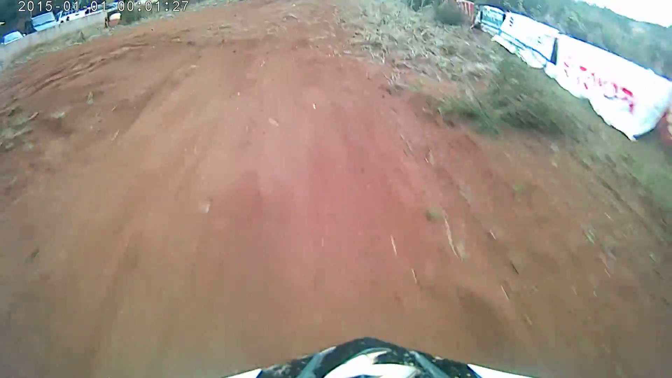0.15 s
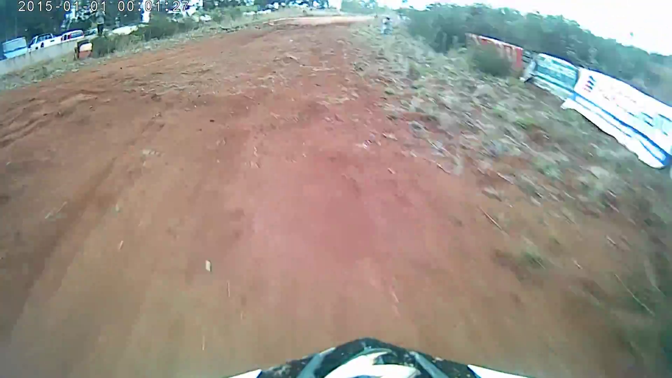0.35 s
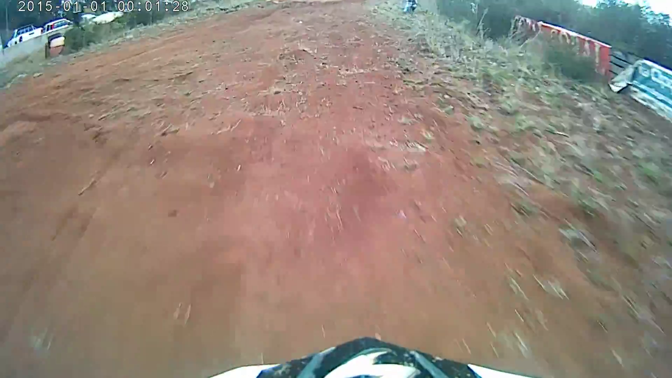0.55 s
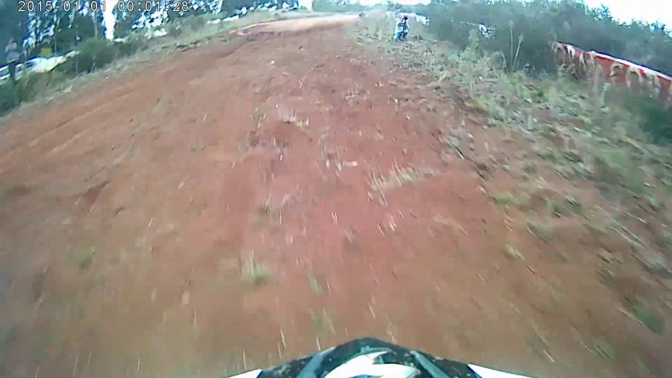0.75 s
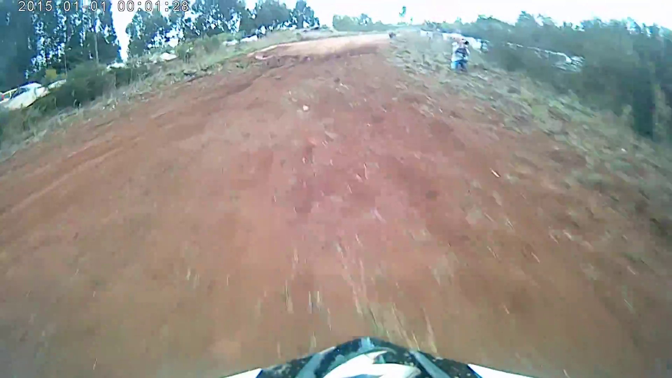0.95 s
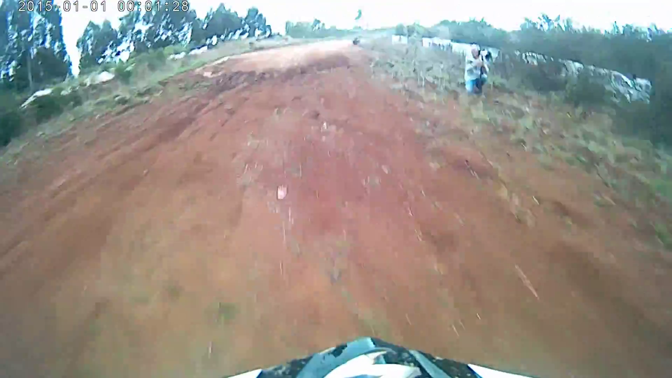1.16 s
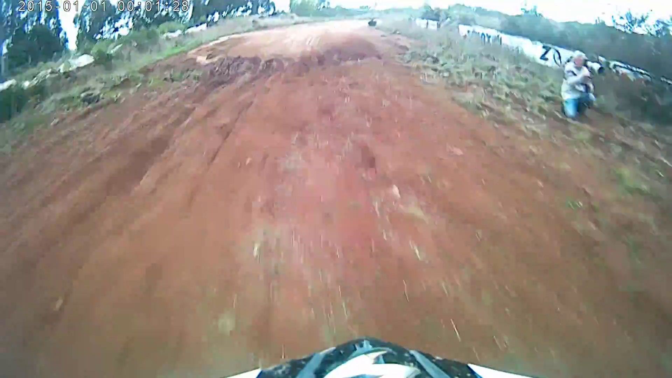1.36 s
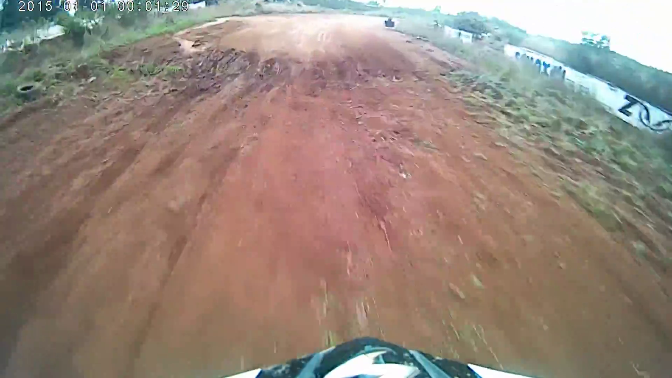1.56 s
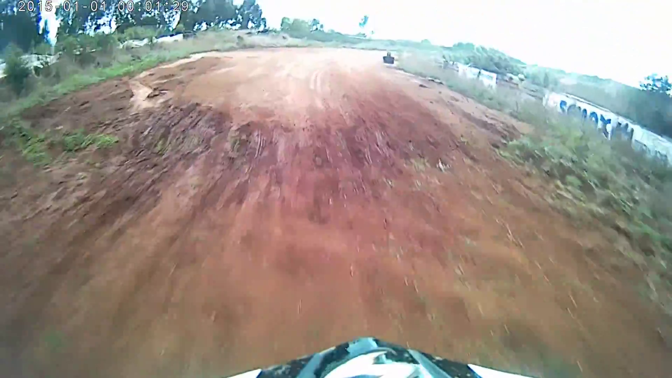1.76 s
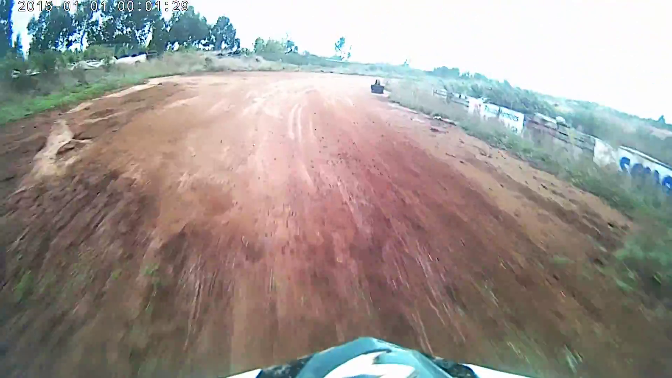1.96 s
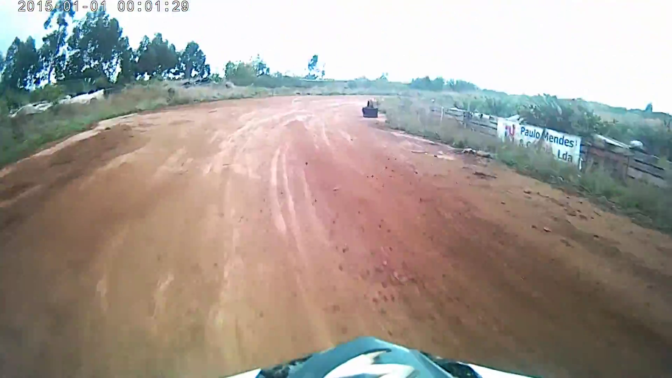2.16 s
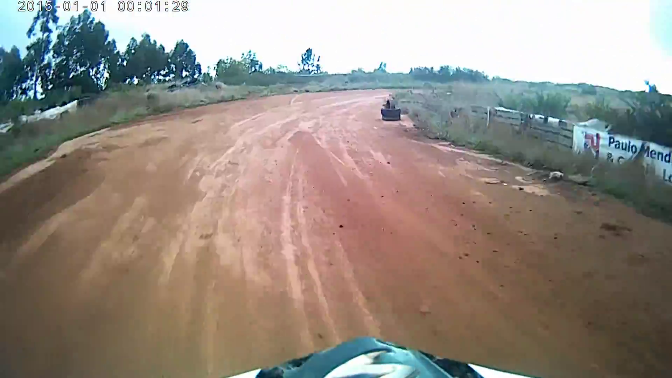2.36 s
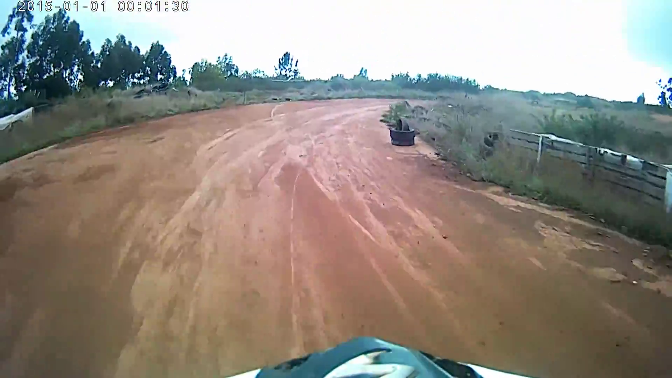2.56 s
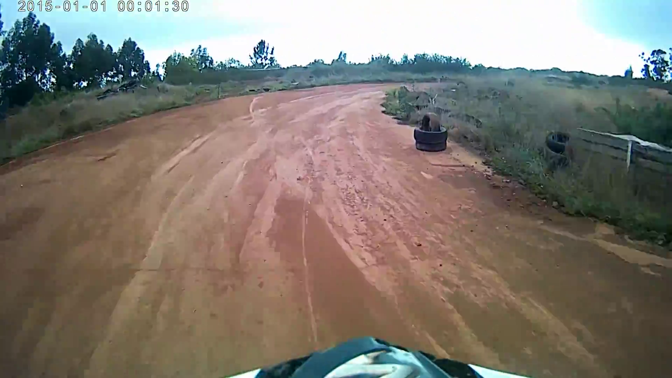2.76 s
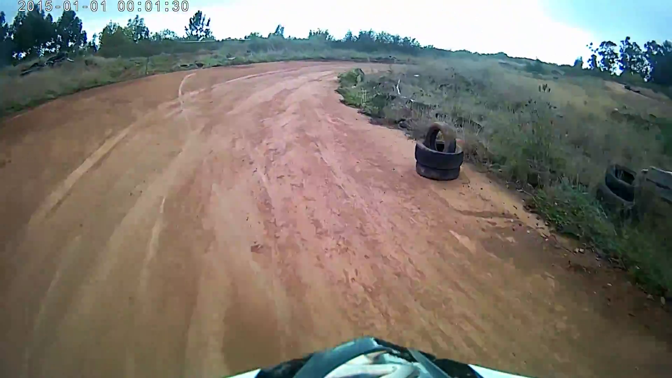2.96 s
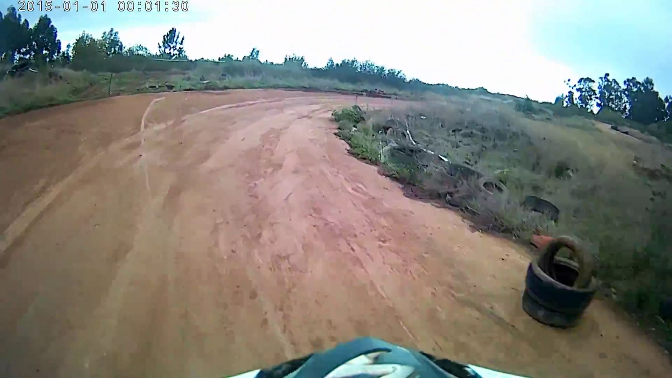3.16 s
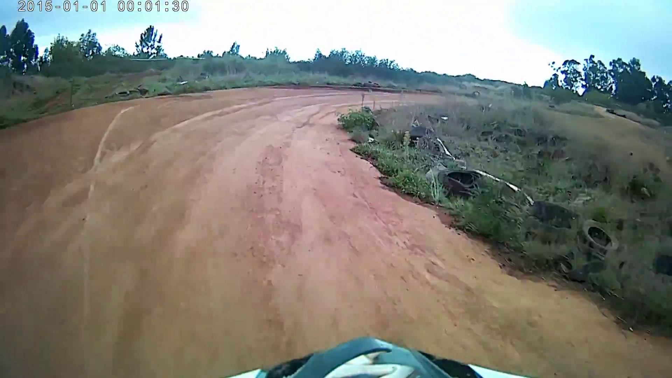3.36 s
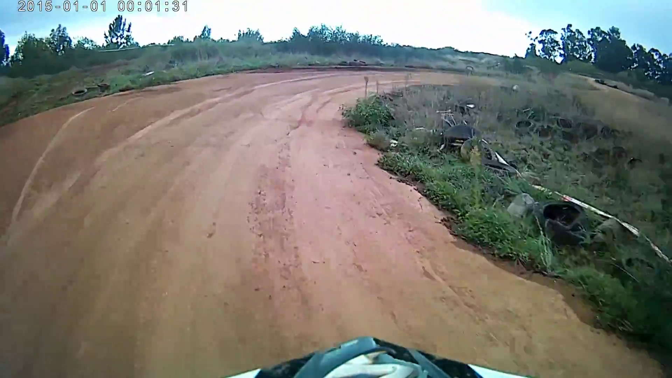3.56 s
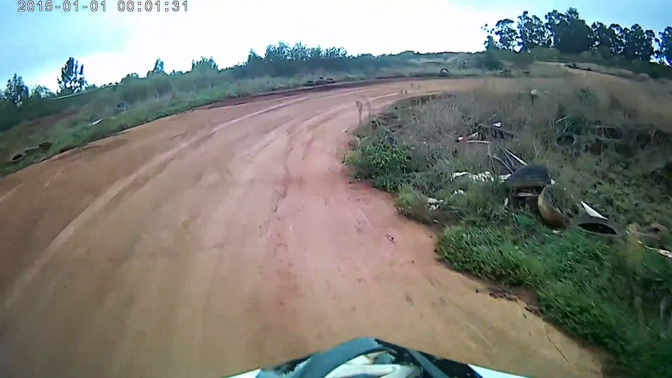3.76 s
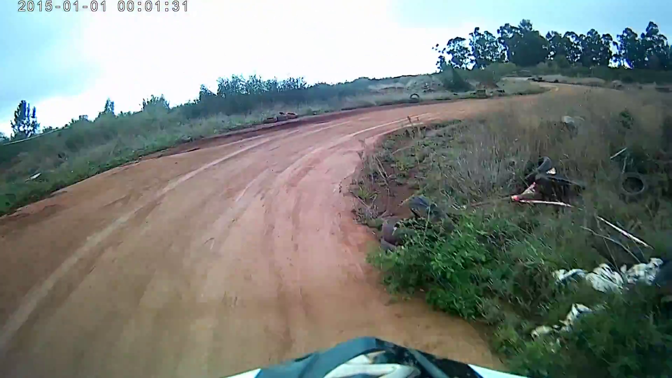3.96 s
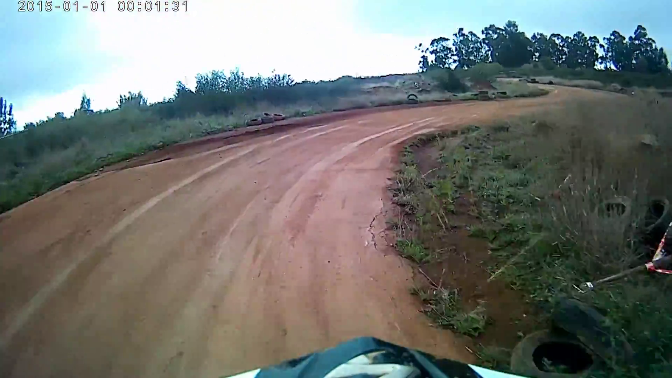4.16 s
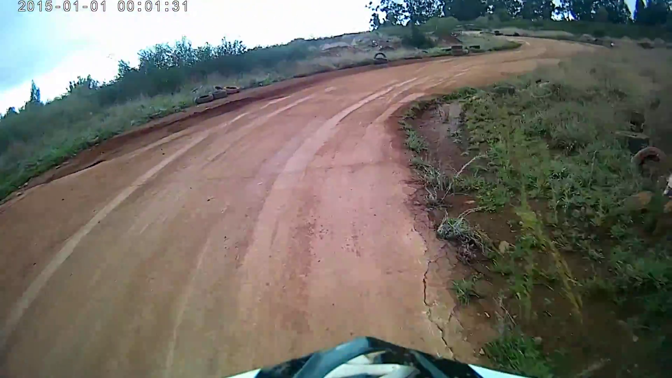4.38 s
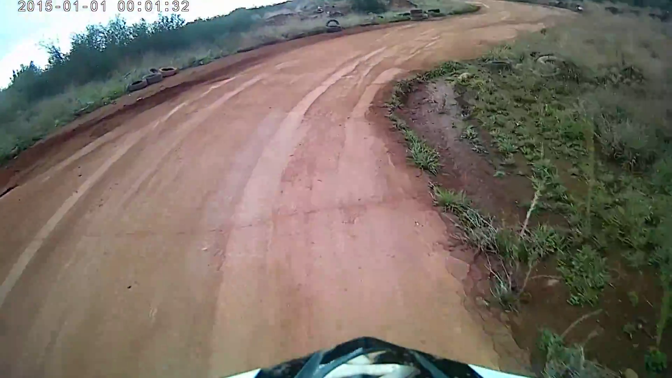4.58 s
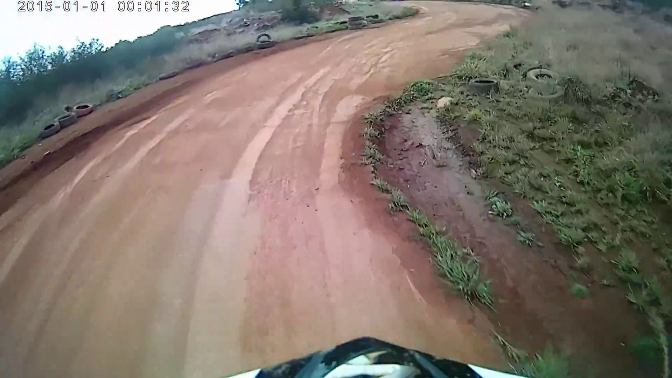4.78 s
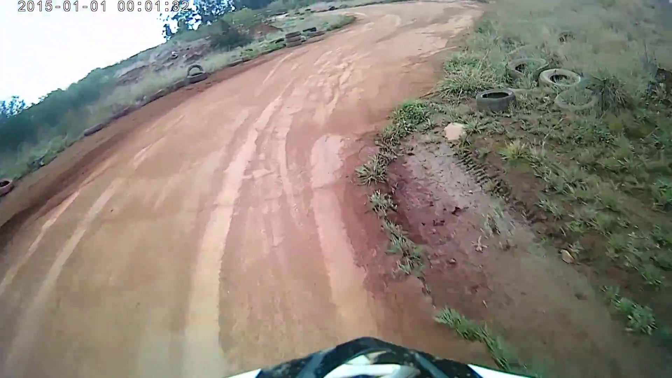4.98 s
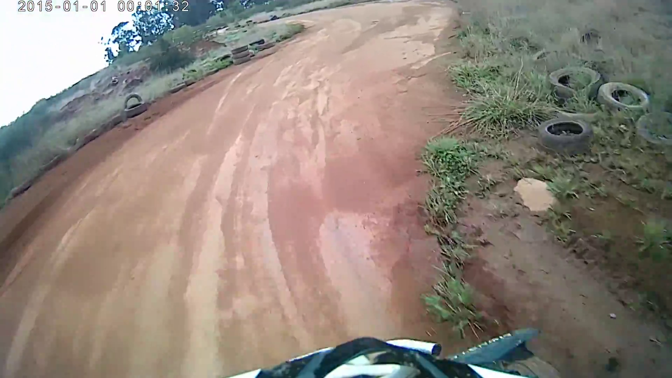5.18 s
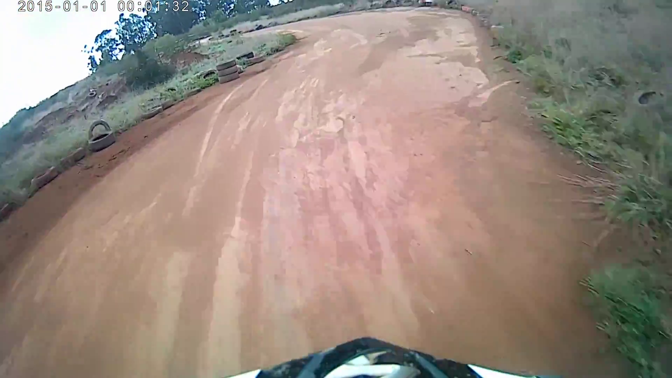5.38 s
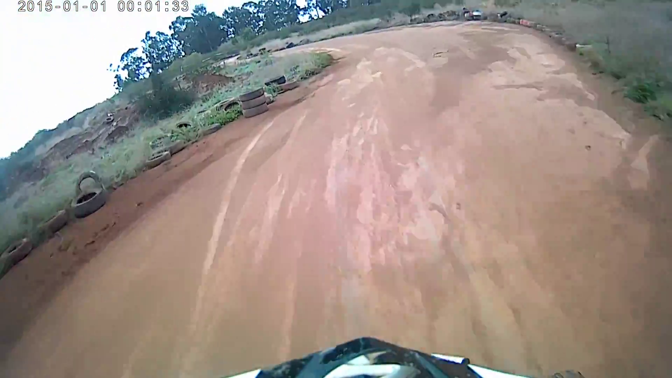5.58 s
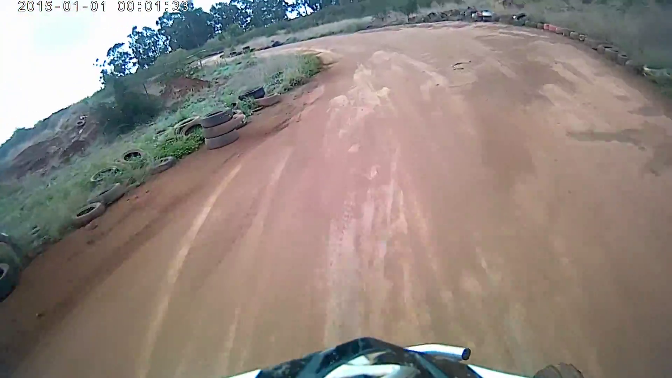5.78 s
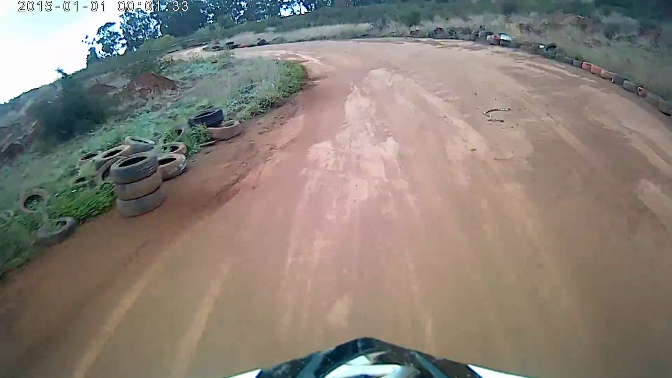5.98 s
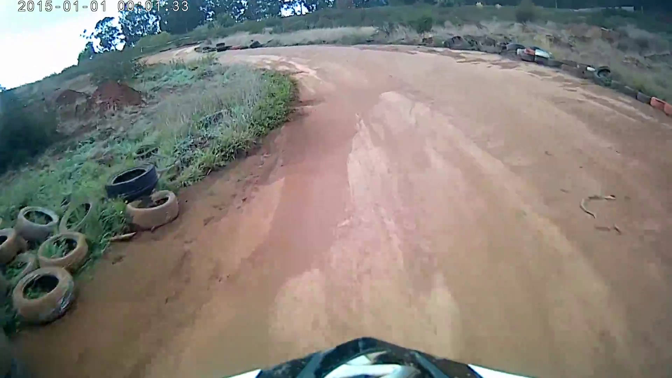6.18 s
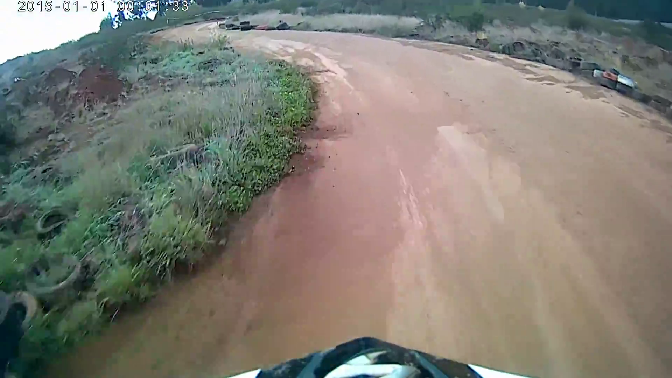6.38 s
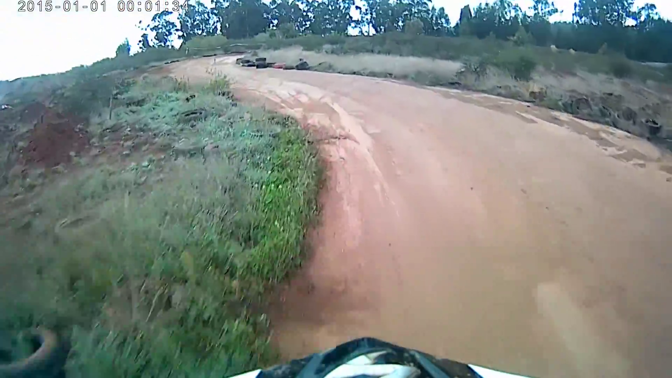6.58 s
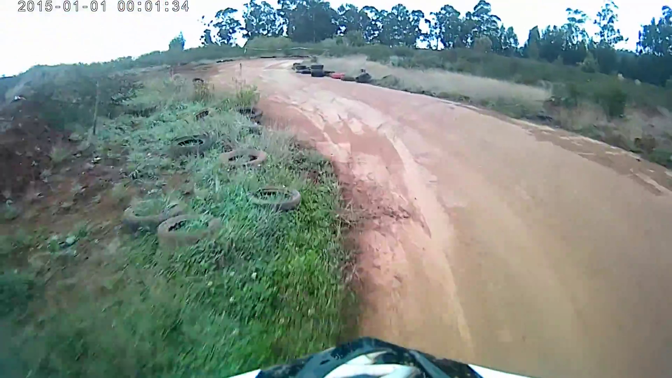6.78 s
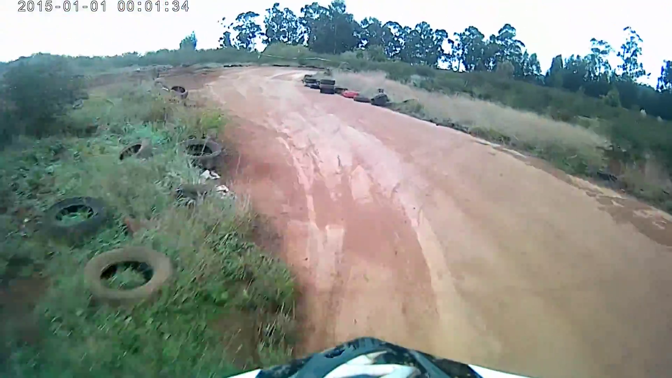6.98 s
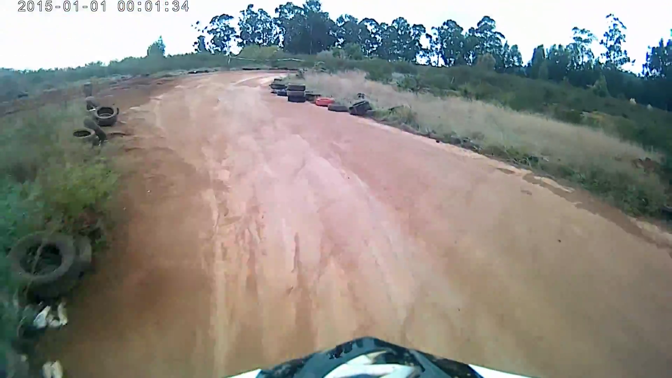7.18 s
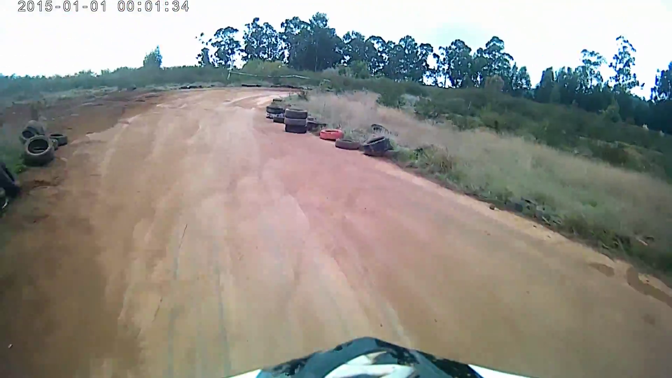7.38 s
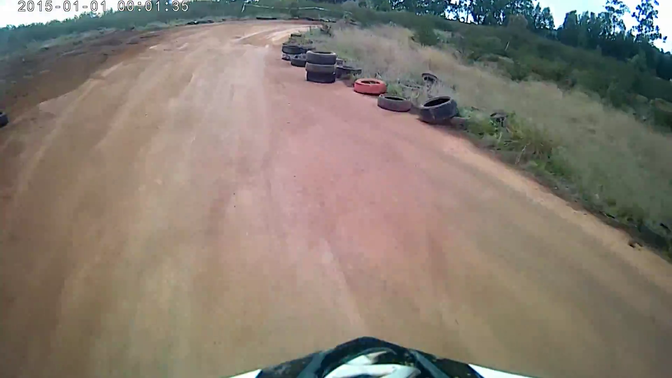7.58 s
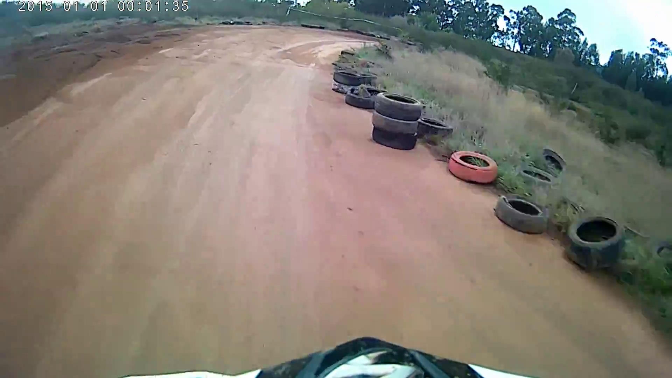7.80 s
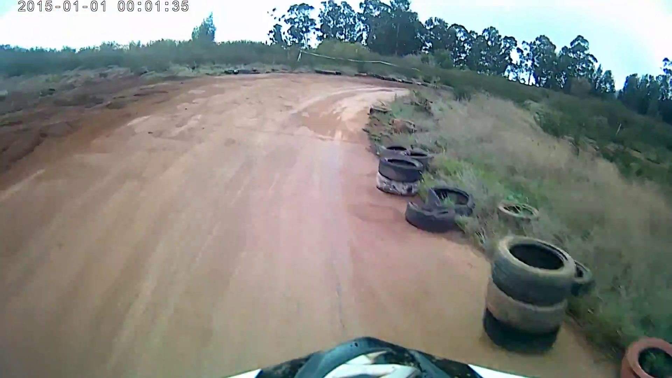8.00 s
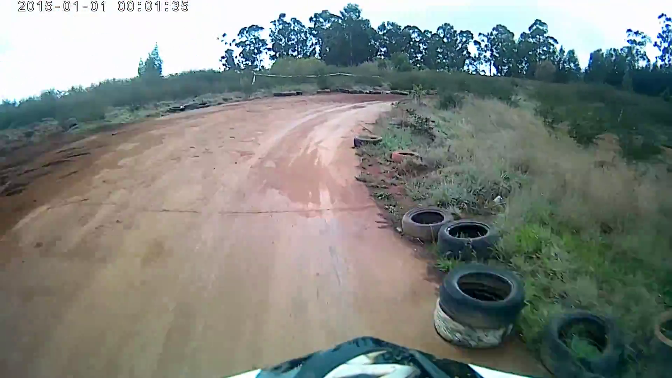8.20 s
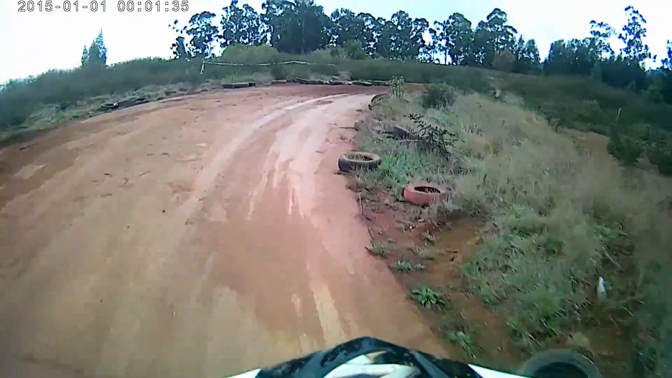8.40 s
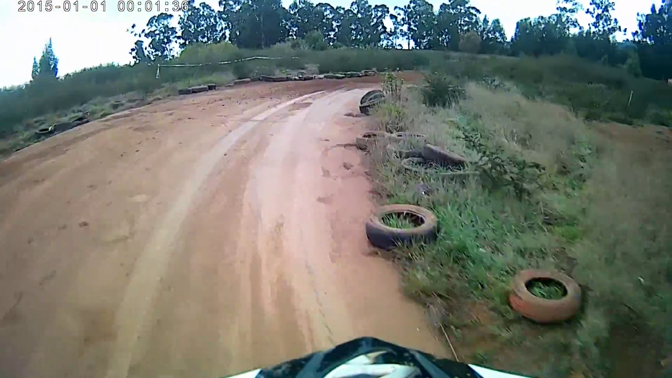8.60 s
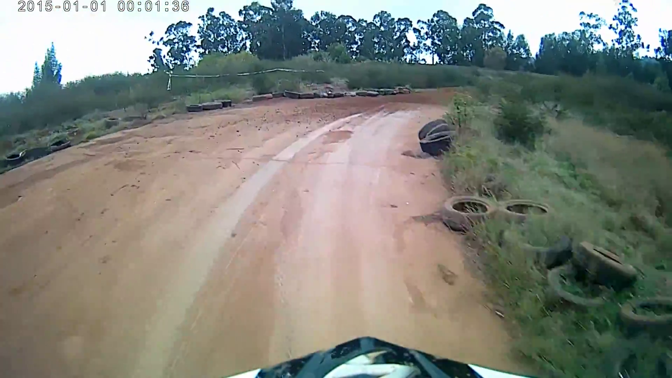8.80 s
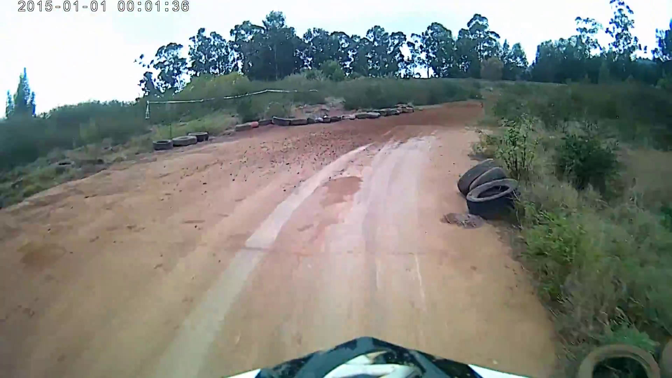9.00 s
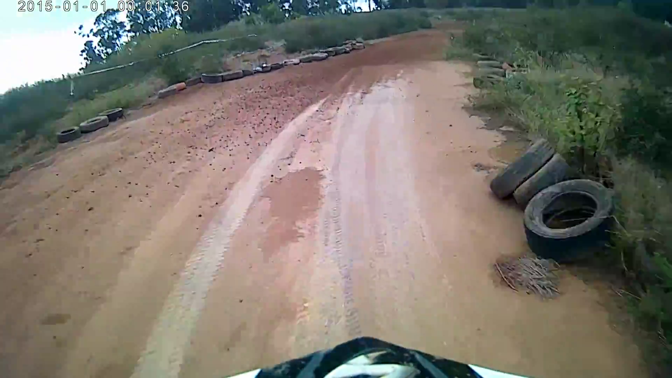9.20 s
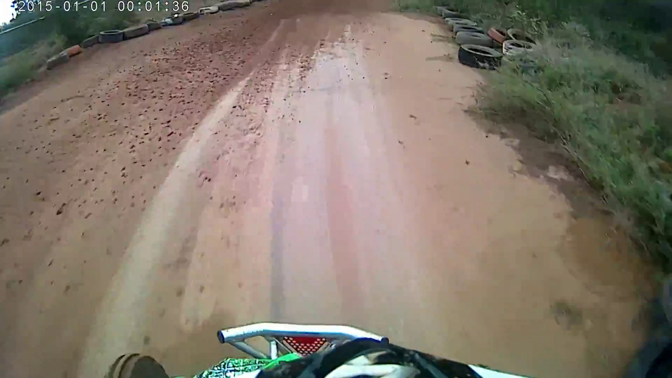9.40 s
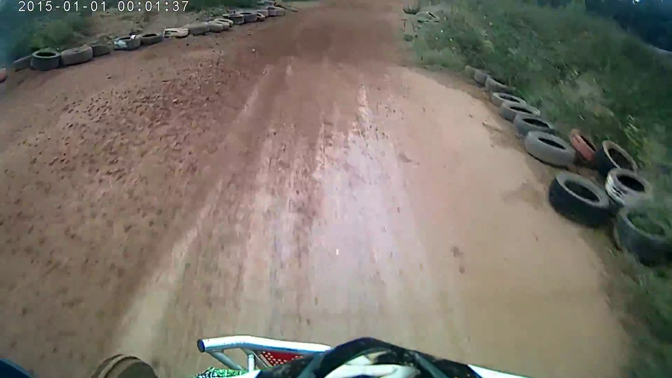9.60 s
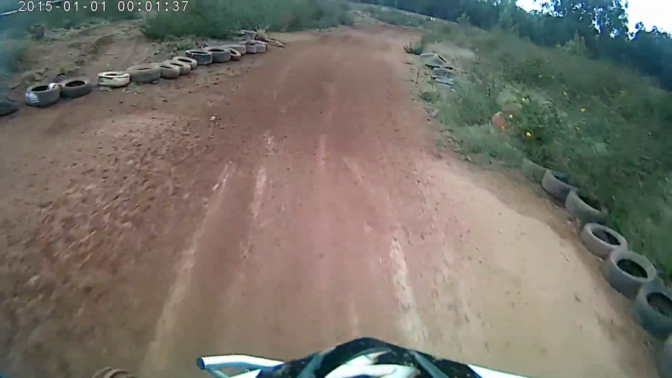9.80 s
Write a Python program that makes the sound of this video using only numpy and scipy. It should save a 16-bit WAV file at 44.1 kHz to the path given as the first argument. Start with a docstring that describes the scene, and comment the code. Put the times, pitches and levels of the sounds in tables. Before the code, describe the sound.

A single-cylinder quad engine revs hard and eases off repeatedly on a dirt track, with bumps and wind buffeting an onboard microphone.

```python
"""A single-cylinder racing quad on a dirt track, heard from a small camera riding on it.
It starts fast, each firing ringing the exhaust and barking, while wind and bumps shake the microphone
and overload the narrow-band recorder. From 1.8 s the engine clatters on the overrun; the chassis
thumps at 2.2 s, two throttle blips follow and the speed sinks near idle. From 4.5 s it climbs again
in a string of pulls, coasts at 7.8 s and pulls from 8.6 s to the end."""
import sys
import numpy as np
from scipy import signal
from scipy.fft import rfft, irfft, next_fast_len
from scipy.io import wavfile
from scipy.ndimage import uniform_filter1d

SR = 44100
rng = np.random.default_rng(int(sys.argv[2]) if len(sys.argv) > 2 else 0)


def file_out(sig):
    """Save sig as 16-bit WAV at sys.argv[1]."""
    # one column per channel
    cols = np.atleast_2d(sig).T
    # limit, then scale
    lim = np.clip(cols, -1, 1)
    pcm = np.round(lim * 32767).astype(np.int16)
    wavfile.write(sys.argv[1], SR, pcm)


N = 434385
TIME = np.arange(N) / SR


def from_db(db):
    """Decibels to gain."""
    return 10 ** (np.asarray(db) / 20)


def curve(points, at=TIME):
    """Interpolate (x, y) points, by default over time."""
    return np.interp(at, *np.transpose(points))


def evened(x, size=3000):
    """Hold the running rms at 1; window size in samples."""
    return x / np.sqrt(uniform_filter1d(uniform_filter1d(x * x, size), size) + 1e-14)


def noise(spectrum):
    """Noise of rms 1, shaped by (Hz, dB) points."""
    hz, db = np.transpose(spectrum)
    size = next_fast_len(N + 8192)
    grid_hz = np.maximum(np.arange(size // 2 + 1) * SR / size, 1)
    gain = from_db(np.interp(np.log(grid_hz), np.log(hz), db))
    x = irfft(rfft(rng.standard_normal(N), size) * gain, size)[:N]
    return x / x.std()


def drift(rate_hz):
    """Random wander, spread about 1."""
    knots = rng.standard_normal(4000)
    return np.interp(TIME * rate_hz, np.arange(len(knots)), knots)


def resonate(x, hz, width_hz):
    """One resonance, peak gain 1."""
    r = np.exp(-np.pi * width_hz / SR)
    feedback = [1, -2 * r * np.cos(2 * np.pi * hz / SR), r * r]
    return signal.lfilter(np.array([1, 0, -1]) * (1 - r * r) / 2, feedback, x + 1e-18)


def per_firing(cycles, spread_db):
    """One random gain per engine cycle."""
    return from_db(spread_db * np.clip(rng.standard_normal(1000), -2, 1.5))[np.floor(cycles).astype(int)]


def rider(idle=0.11, shut_s=0.038, swell_ratio=1.72):
    """Throttle pulls: opening (0-1), extra bark that builds more slowly (dB), clean ring (dB)."""
    # throttle pulls: (opens [s], shuts [s], rise [s], opening [0-1], extra bark [dB], ring over gas [dB])
    pulls = [(-.05, .92, 0.039, 0.71, 5.5, 0), (.8, 1.016, 0.061, 0.74, 8, 1),
             (1.316, 1.477, 0.1, 0.68, 10.5, 4), (1.59, 1.787, 0.066, 0.68, 7, 0),
             (2.975, 3.13, .06, 0.51, 1, -1), (3.317, 3.63, 0.15, 0.61, 2, 3),
             (4.47, 5.594, 0.23, 0.79, 9, 3.5), (5.53, 6.18, 0.062, 0.83, 8, 2.5),
             (6.197, 6.452, 0.12, .85, 9, -1), (6.624, 6.773, 0.066, 0.65, 5.5, 2),
             (6.85, 7.106, 0.078, 0.75, 6, 2), (7.282, 7.834, 0.046, 0.79, 8, 0.5),
             (8.587, 8.805, 0.12, 0.67, 7, 3.5), (8.95, 9.95, 0.12, 0.77, 7, 1.5)]
    throttle, push_db, ring_db = np.full(N, idle), 0, 0
    for opens_s, shuts_s, rise_s, opening, extra_db, clean_db in pulls:
        held = np.clip(1 - (TIME - shuts_s) / shut_s, 0, 1)
        opened = held * np.clip((TIME - opens_s) / rise_s, 0, 1)
        swell = held * np.clip((TIME - opens_s) / (swell_ratio * rise_s), 0, 1)
        throttle = np.maximum(throttle, opening * opened)
        push_db = np.maximum(push_db, extra_db * swell)
        ring_db = np.maximum(ring_db, clean_db * opened)
    return throttle, push_db, ring_db


def exhaust_drone(firing_hz, cycles, throttle, waver_db=2.5, odd_db=-3.5):
    """Engine orders swell as they glide through the exhaust resonances: low hum, boom, upper growl."""
    # exhaust resonances: (frequency [Hz], width [Hz], level under load [dB], level on overrun [dB])
    modes = [(83.5, 18, -23, -4), (121.7, 23, -0.5, -4.5), (170.2, 31, -23, -4), (207, 29, -7.5, -10.5),
             (236, 31, 3, -11), (316.1, 23.4, 5.5, 5.5), (487.6, 32, -5.5, 2.5), (512.4, 35, 4, -23.5),
             (580, 63, -5.5, -22), (770, 40, -7.5, -10), (794, 45, -13.5, -33.5)]
    # lowest engine orders under load: (order [-], level [dB])
    order_levels = [(2, -1.5), (3, -2), (4, -3), (5, 13), (6, 4), (7, -3.5), (8, -2.5)]
    grid_hz = np.arange(2000)
    loaded = sum(from_db(db) / (1 + 2j * (grid_hz - hz) / width) for hz, width, db, _ in modes)
    coasting = sum(from_db(db) / (1 + 2j * (grid_hz - hz) / width) for hz, width, _, db in modes)
    coasting *= np.exp(-1j * (grid_hz / 110) ** 2)   # unfired gas is pumped out gradually
    fundamental = np.exp(2j * np.pi * cycles)
    wave, hum, boom, growl = -fundamental, 0, 0, 0
    shut = 1 - throttle
    for k in range(2, 22):
        wave, hz = wave * fundamental, k * firing_hz
        pipe = throttle * np.interp(hz, grid_hz, loaded) + shut * np.interp(hz, grid_hz, coasting)
        # without combustion the crank's even orders take over
        level_db = throttle * curve(order_levels, k) + shut * (k % 2) * odd_db
        order = from_db(level_db + waver_db * drift(18)) * (pipe * wave).real
        low, high = np.interp(hz, [262, 292], [1, 0]), np.interp(hz, [380, 420], [0, 1])
        hum += low * order
        boom += (1 - low - high) * order
        growl += high * order
    return evened(hum), boom, evened(growl)   # boom flares as an order crosses the main resonance


def exhaust_bark(firing_hz, cycles, throttle, ring_db, echo_s=0.002428, gush_s=0.006):
    """The valve opens with a crack that rings the silencer; a gush of turbulent gas follows."""
    # silencer and airbox resonances: (frequency [Hz], width [Hz], level [dB])
    modes = [(1070, 26, -5), (1227.6, 50, 4.5), (1425, 260, -5), (1540, 55, -7.5), (1686, 28, 7.5),
             (1900, 140, -11.5), (2240, 64, -21), (3010, 830, -16)]
    # turbulent gas: (frequency [Hz], spectral density [dB])
    gas_spectrum = [(380, -17.5), (650, -12), (706, -18.5), (820, -18), (925, -21.5), (1000, -5.5),
                    (1230, -1), (1530, -2), (1710, -2), (2060, -8.5), (2240, -9.5), (2510, -21.5),
                    (3380, -23), (3900, -30.5), (5070, -71.5), (8580, -120)]
    age_s = (cycles % 1) / firing_hz
    valve = np.exp(-(age_s / gush_s) ** 2)
    crack = np.diff(np.floor(cycles), prepend=-1)
    crack += 0.13 * np.interp(TIME - echo_s, TIME, crack)   # reflection along the pipe
    ring = sum((-1) ** k * from_db(db) * resonate(crack, hz, width)
               for k, (hz, width, db) in enumerate(modes))
    ring *= (1 - np.exp(-age_s / 0.00091)) * (valve + 0.32)   # loudest while gas flows
    gush = (1 - np.exp(-age_s / 0.0014)) * valve + 0.2   # some hiss stays between gushes
    gas = from_db(8.1 - ring_db - 3 * throttle) * evened(gush * noise(gas_spectrum), size=900)
    # no two combustions are equally strong
    force = throttle * per_firing(cycles, 0.54) + (1 - throttle) * per_firing(cycles, -0.5)
    return evened(evened(evened(ring) + gas, size=1100) * force)


def exhaust_throb(cycles):
    """Gas flow pulsing at the firing rate, rms 1."""
    return -np.sqrt(2) * np.cos(2 * np.pi * cycles)


def clatter(cycles, depth=0.35, decay_turns=1.6):
    """Piston and valve gear rattle on every crank turn, two turns per firing."""
    # engine clatter: (frequency [Hz], spectral density [dB])
    spectrum = [(330, -43), (560, -15), (622, -2.5), (681, -14.5), (732, 0), (934, -8.5), (989, -4.5),
                (1060, -7), (1250, 2), (1420, 0), (1530, -4.5), (1720, 1), (2380, -16.5), (3290, -15),
                (3900, -35.5), (5070, -50), (8580, -120)]
    slap = np.exp(-(2 * cycles % 1) / decay_turns) * per_firing(cycles, spread_db=3)
    return evened(noise(spectrum) * (1 + depth * slap))


def engine(firing_hz, octaves, lug_hz=53, wander=0.001, jitter_cycles=0.0015):
    """Drone, throb, bark and clatter, their levels following speed and throttle."""
    throttle, push_db, ring_db = rider()
    cycles = np.cumsum(firing_hz * (1 + wander * drift(14))) / SR + jitter_cycles * drift(60)
    lugging_hz = np.maximum(lug_hz - firing_hz, 0)
    bark_db = -26 + 12 * octaves + push_db
    hum, boom, growl = exhaust_drone(firing_hz, cycles, throttle)
    hum *= from_db(-27 + 7 * octaves + 1.25 * throttle)
    boom *= from_db(-27.5 + 8 * octaves - throttle - 0.25 * lugging_hz)
    growl *= from_db(-14 + 0.74 * bark_db)
    drone = from_db(0.48 * ring_db) * (hum + boom + growl)
    throb = from_db(-32 + 16.5 * octaves + 7 * throttle) * exhaust_throb(cycles)
    # firings stand out of the clatter on open throttle and near idle
    bark_share = np.clip(1.1 * throttle + 0.031 * lugging_hz, 0, 0.97)
    bark = np.sqrt(bark_share) * exhaust_bark(firing_hz, cycles, throttle, ring_db)
    rattle = np.sqrt(1 - bark_share) * clatter(cycles)
    return drone + throb + from_db(bark_db) * (bark + rattle)


def jolts(thud_decay_s=0.022):
    """Bumps give one slow pressure swing; hard landings set the chassis booming."""
    # air shoved against the microphone: (time [s], length [s], peak [dB])
    bumps = [(0.215, 0.06, -4.5), (0.343, 0.036, -7.5), (0.756, 0.028, -2.5), (0.826, 0.058, -3.5),
             (.982, 0.026, -9), (1.09, 0.066, -5), (2.195, 0.029, -4), (3.895, 0.045, -13),
             (7.67, 0.014, -29.5), (9.273, 0.043, -12)]
    # chassis thumps over ruts: (time [s], frequency [Hz], level [dB])
    thuds = [(1.12, 41.7, -9), (1.27, 55, -14.5), (1.38, 42.2, -19), (2.234, 72, -8), (2.248, 73, -2.5)]
    pressure = np.zeros(N)
    for start_s, length_s, db in bumps:
        pressure -= from_db(db) * np.sin(np.pi * np.clip((TIME - start_s) / length_s, 0, 1))
    for start_s, hz, db in thuds:
        age_s = np.maximum(TIME - start_s, 0)
        pressure += from_db(db) * np.sin(2 * np.pi * hz * age_s) * np.exp(-age_s / thud_decay_s)
    return pressure


def wind(level_db):
    """Air buffets the microphone."""
    # buffeting: (frequency [Hz], spectral density [dB])
    spectrum = [(3, -12.5), (8, 1.5), (13, 2), (22, -10), (35, -28.5), (60, -24), (120, -35.5),
                (400, -51.5)]
    return from_db(level_db) * evened(noise(spectrum), size=6000)


def tyres(octaves, wind_db):
    """Tyres and frame rumble over the dirt, louder with engine speed and wind."""
    # rolling rumble: (frequency [Hz], spectral density [dB])
    spectrum = [(30, -2.5), (70, 8), (150, -10), (240, -5), (320, -0.5), (400, -11.5), (500, -3),
                (620, -14.5), (1000, -43)]
    return from_db(-28 + 10.5 * octaves + 0.31 * (wind_db - wind_db.mean())) * noise(spectrum)


def scene():
    """Engine, jolts, tyres and wind at the camera, mono."""
    # engine speed: (time [s], firing rate [Hz])
    speeds = [(0.0, 70.8), (0.1, 80.7), (0.27, 78.3), (0.33, 72.9), (0.4, 76.9), (0.47, 70.7), (0.54, 77.2),
              (0.78, 79.2), (0.83, 74.2), (0.9, 83.0), (0.95, 79.6), (1.0, 84.8), (1.13, 66.3),
              (1.36, 63.5), (1.42, 77.5), (1.63, 68.6), (1.72, 75.1), (1.93, 59.9), (2.02, 62.7),
              (2.25, 60.9), (2.34, 55.5), (2.98, 49.0), (3.12, 56.2), (3.28, 44.9), (3.46, 56.6),
              (3.63, 55.1), (3.83, 43.4), (4.0, 44.7), (4.4, 41.2), (4.53, 42.3), (4.61, 49.6),
              (4.67, 48.5), (4.84, 55.3), (5.15, 61.0), (5.31, 66.4), (5.49, 67.7), (5.69, 65.2),
              (6.16, 74.4), (6.26, 65.5), (6.42, 75.0), (6.62, 58.0), (6.76, 64.7), (6.88, 60.4),
              (7.07, 66.6), (7.27, 54.8), (7.38, 69.0), (7.55, 76.3), (7.85, 77.2), (7.92, 65.3),
              (8.04, 53.8), (8.11, 56.2), (8.54, 45.9), (8.6, 48.8), (8.68, 60.3), (8.93, 47.8),
              (9.05, 61.1), (9.18, 66.5), (9.58, 70.8), (9.72, 67.4), (9.85, 69.4)]
    # wind on the microphone: (time [s], level [dB])
    gusts = [(0, -17.5), (1.15, -12.5), (1.4, -15), (1.95, -17), (2.2, -13), (2.6, -23.5), (3.3, -28),
             (3.95, -26), (4.35, -31), (5.3, -28), (6.2, -23.5), (6.7, -22), (9.85, -24)]
    firing_hz, wind_db = curve(speeds), curve(gusts)
    octaves = np.log2(firing_hz / 60)   # re cruising speed
    return (engine(firing_hz, octaves) + jolts() + tyres(octaves, wind_db) + wind(wind_db))[None]


def record(dry, overload=0.71):
    """A telephone-band input stage rounds the peaks; hard clipping then crackles above that band."""
    rounded = 1.51 * np.tanh(dry / 1.55)
    narrow = signal.sosfilt(signal.butter(12, 3700, fs=SR, output="sos"), rounded)
    narrow = signal.sosfilt(signal.butter(20, 4300, fs=SR, output="sos"), narrow)
    clipped = np.clip(narrow, -overload, overload)
    return signal.sosfilt(signal.butter(24, 15900, fs=SR, output="sos"), clipped)


dry = scene()
out = record(dry)
file_out(out)
```